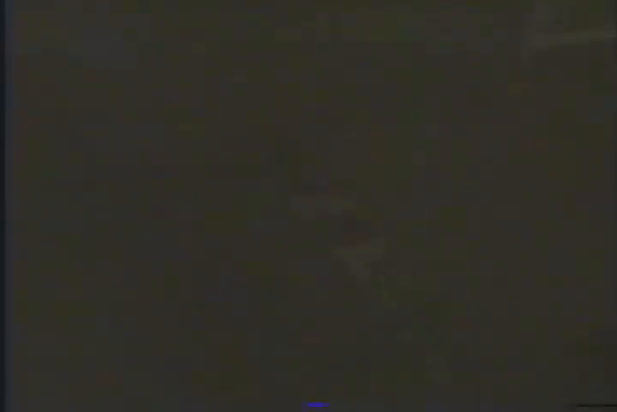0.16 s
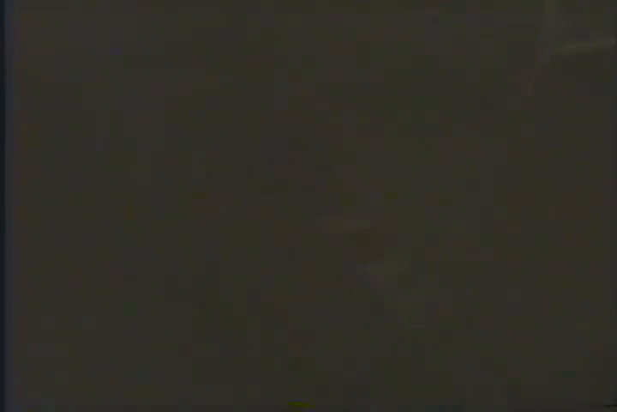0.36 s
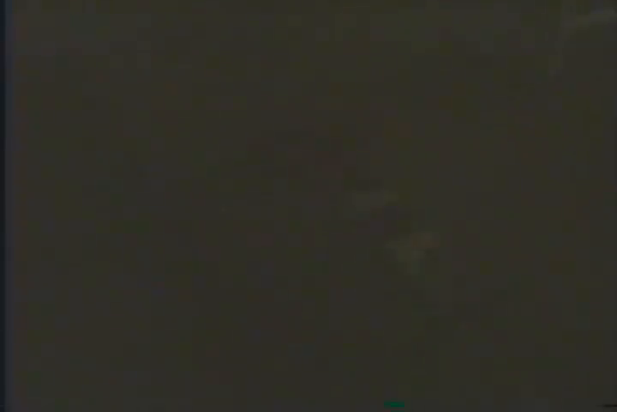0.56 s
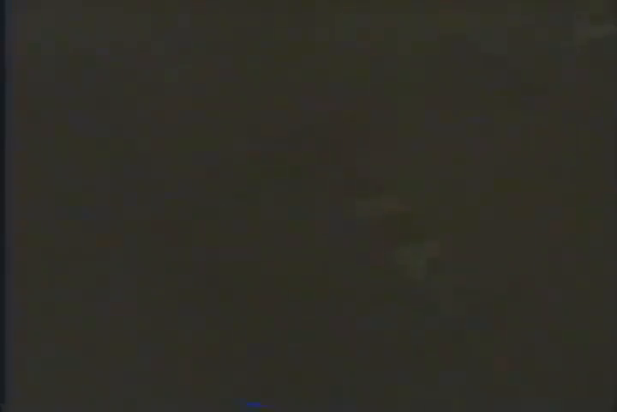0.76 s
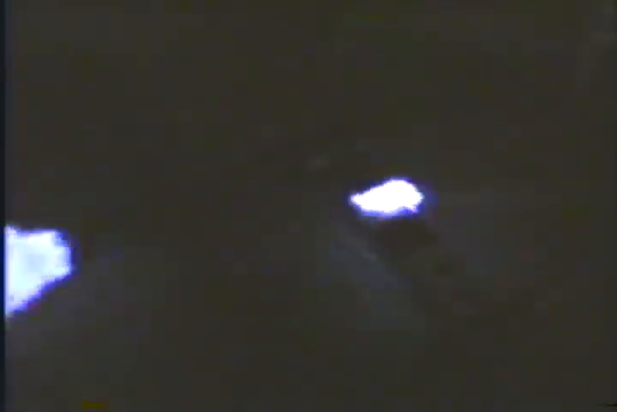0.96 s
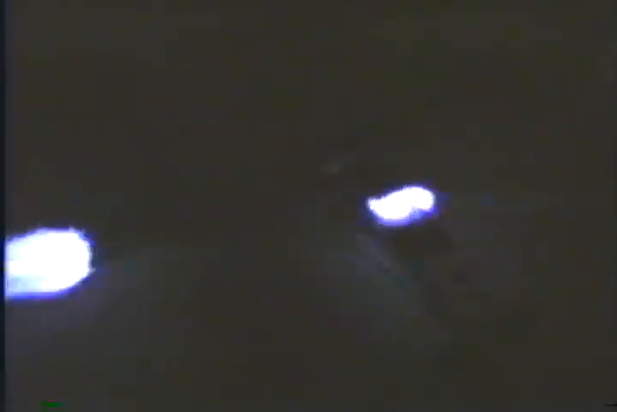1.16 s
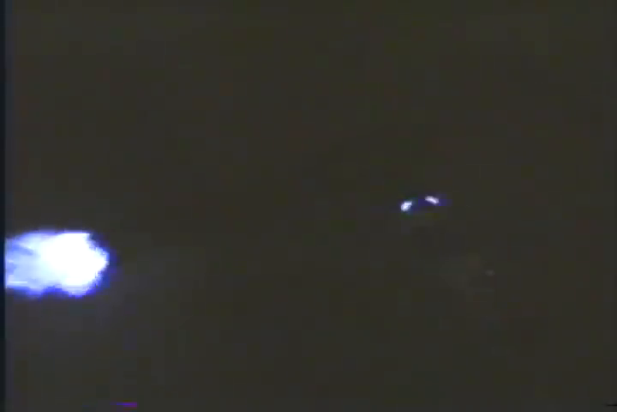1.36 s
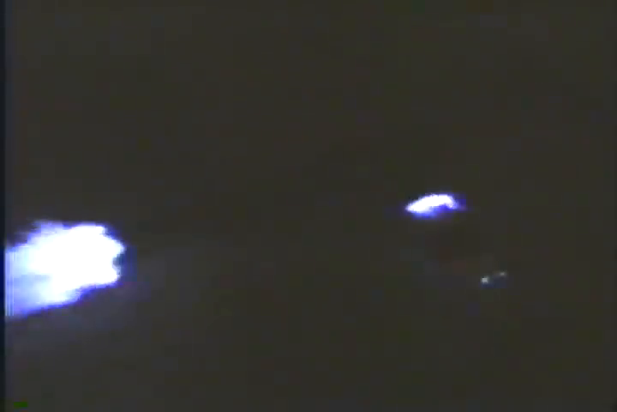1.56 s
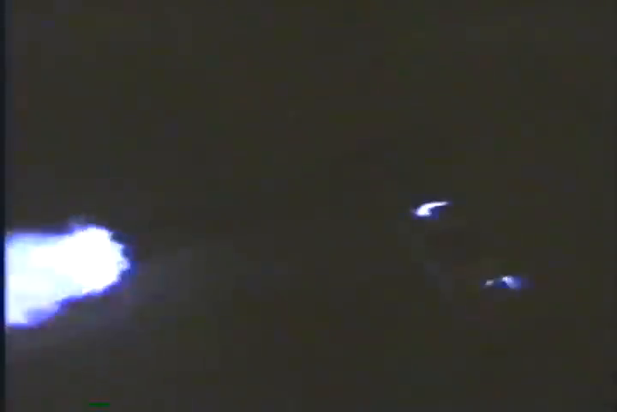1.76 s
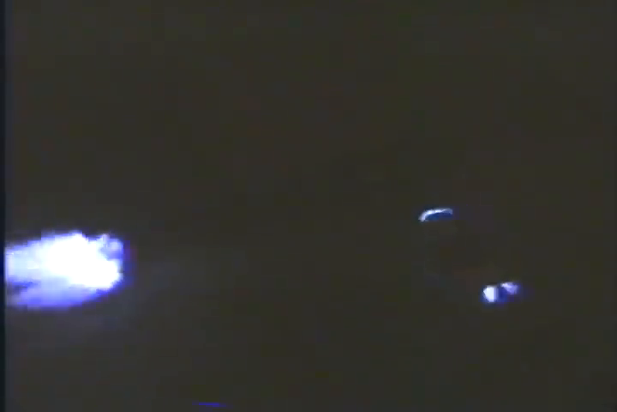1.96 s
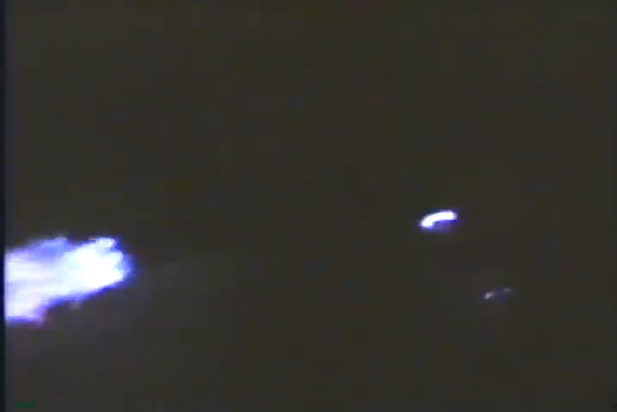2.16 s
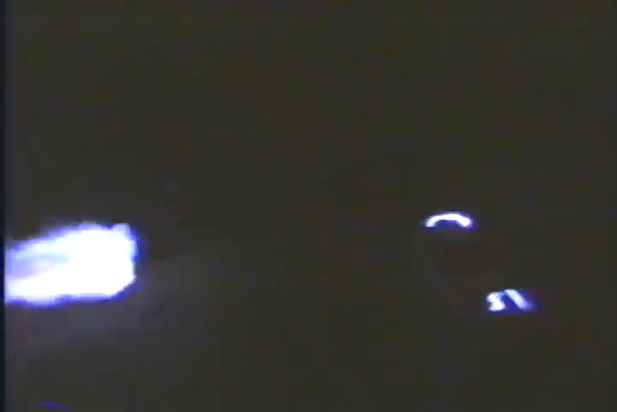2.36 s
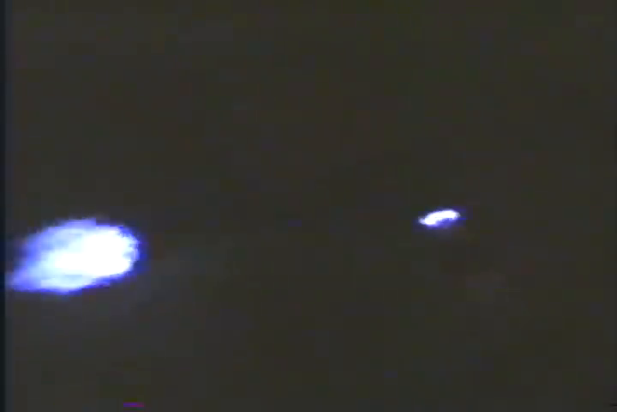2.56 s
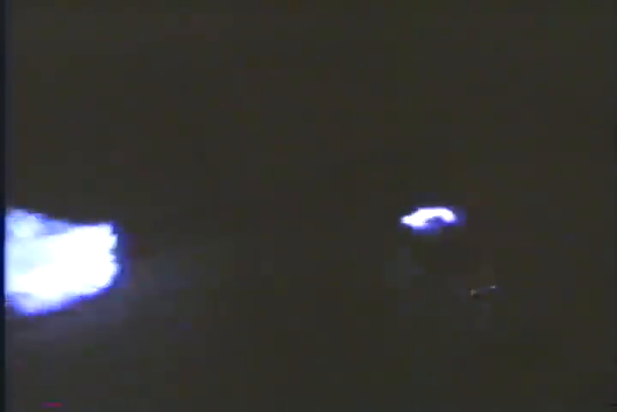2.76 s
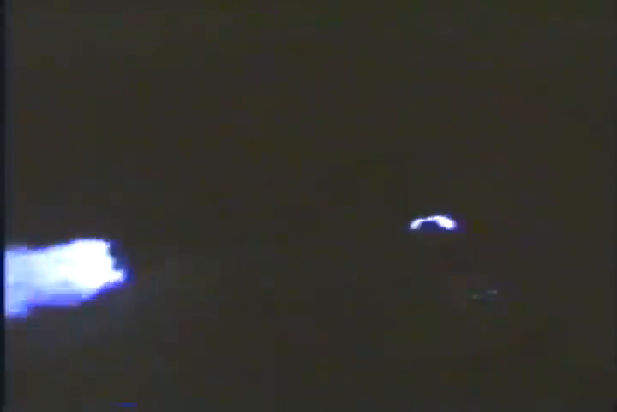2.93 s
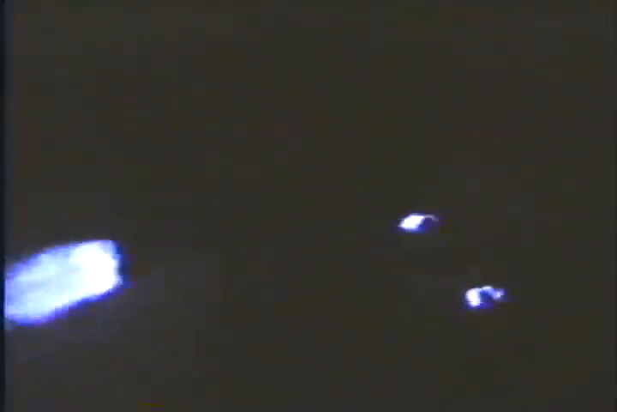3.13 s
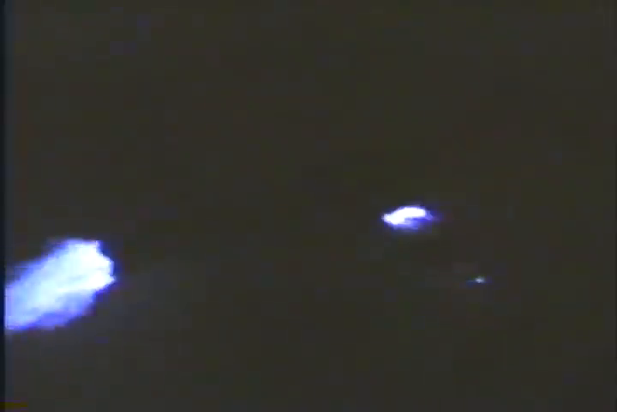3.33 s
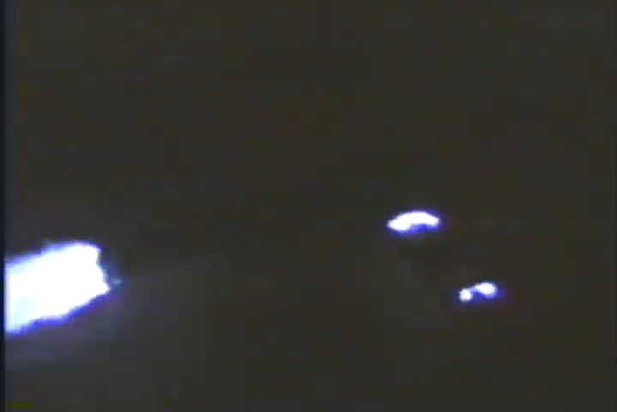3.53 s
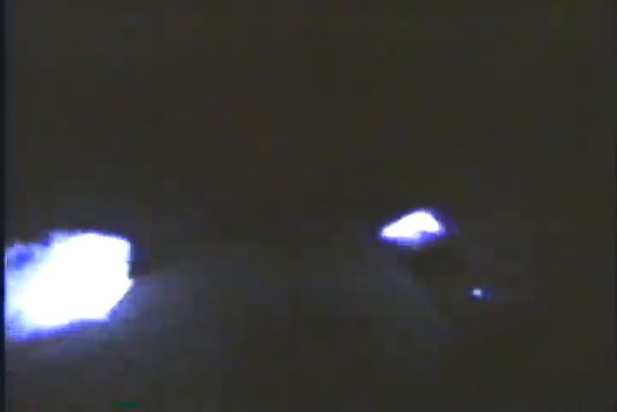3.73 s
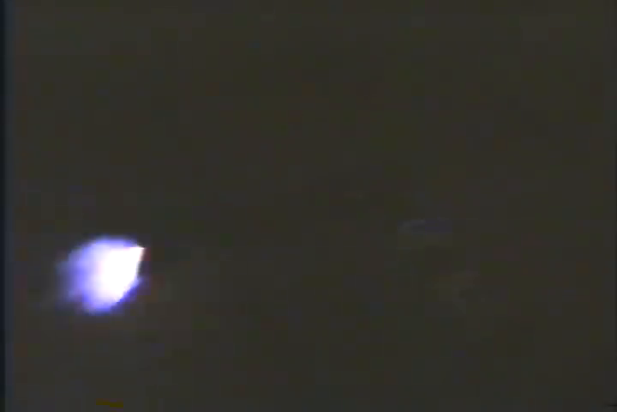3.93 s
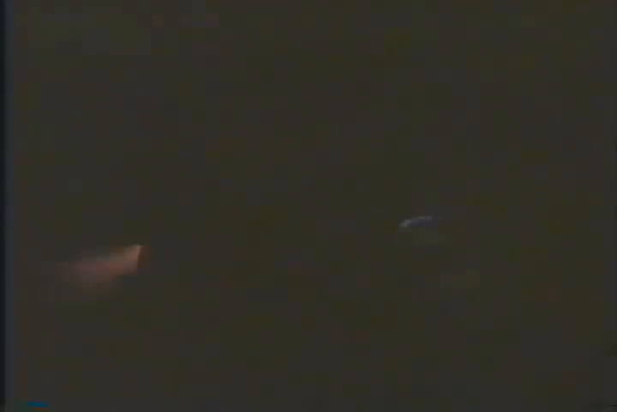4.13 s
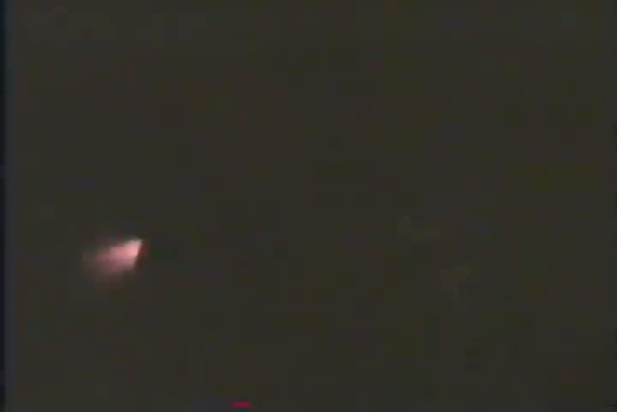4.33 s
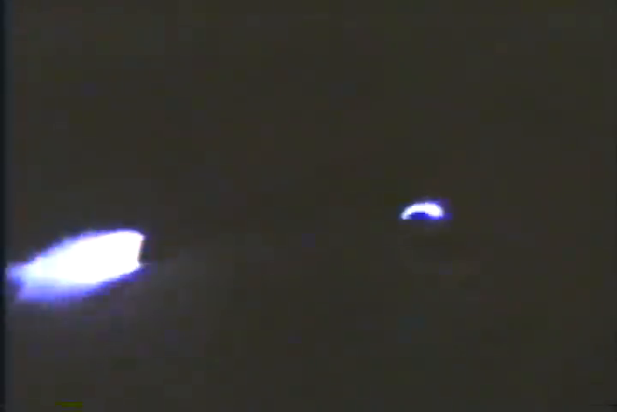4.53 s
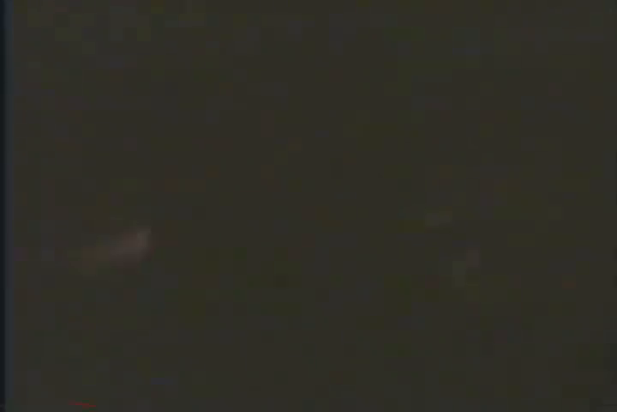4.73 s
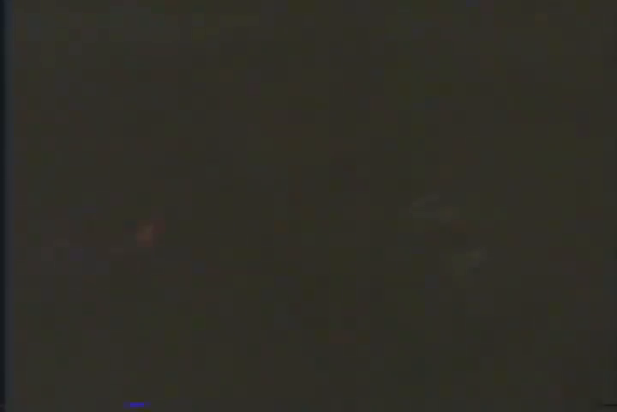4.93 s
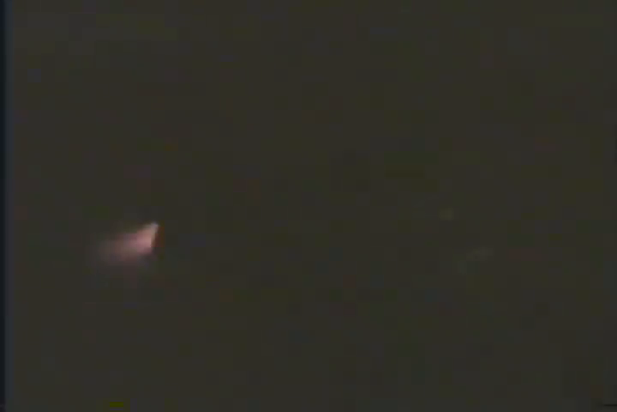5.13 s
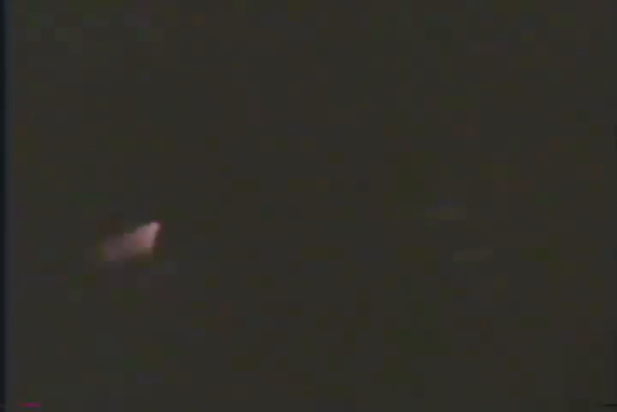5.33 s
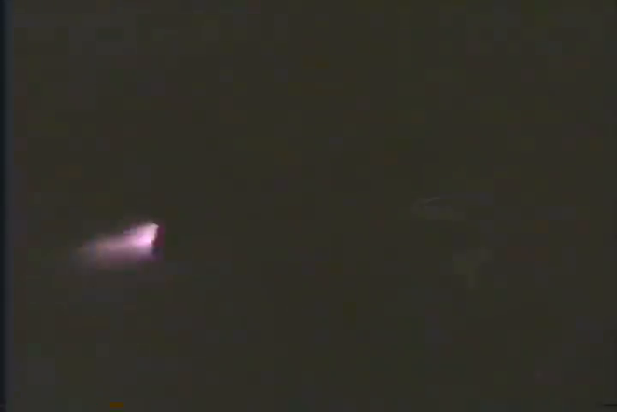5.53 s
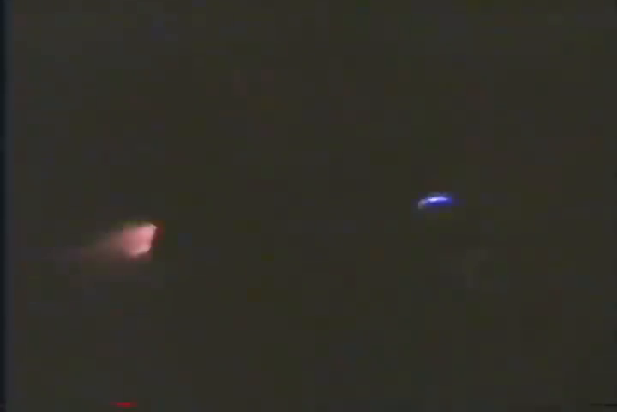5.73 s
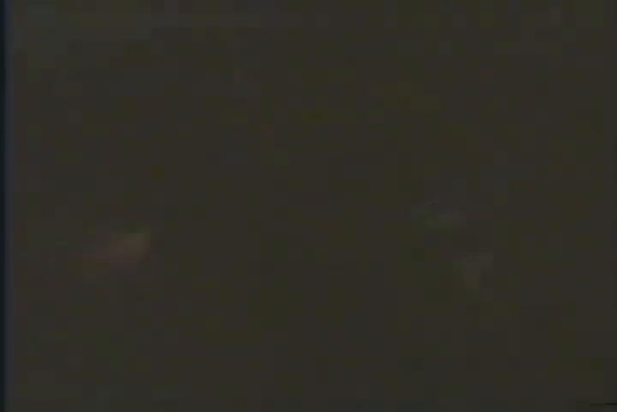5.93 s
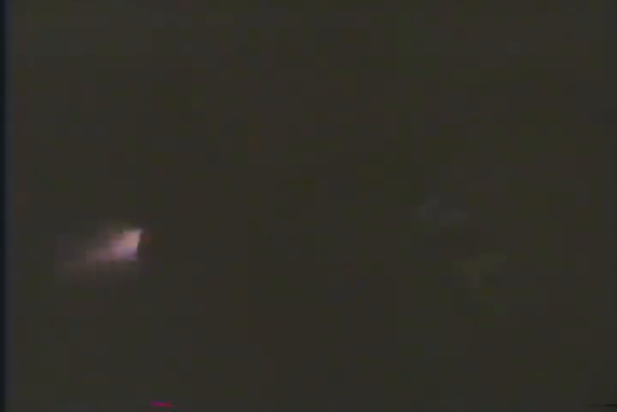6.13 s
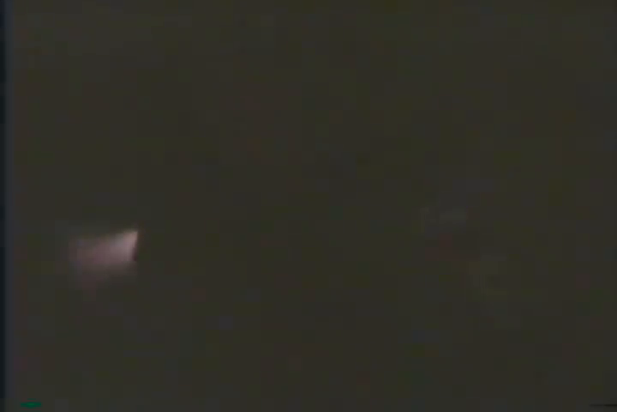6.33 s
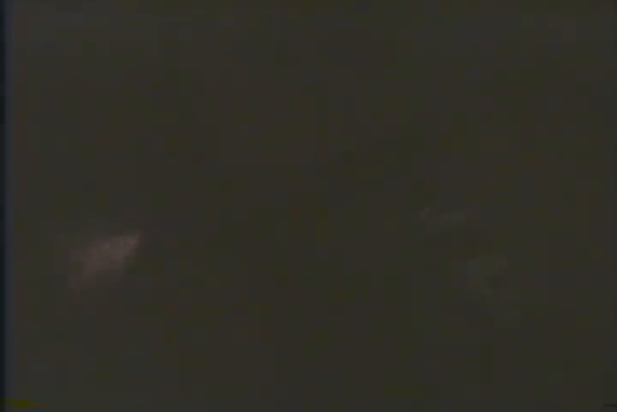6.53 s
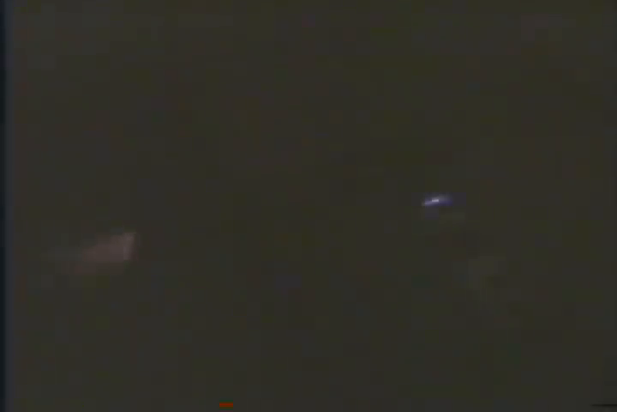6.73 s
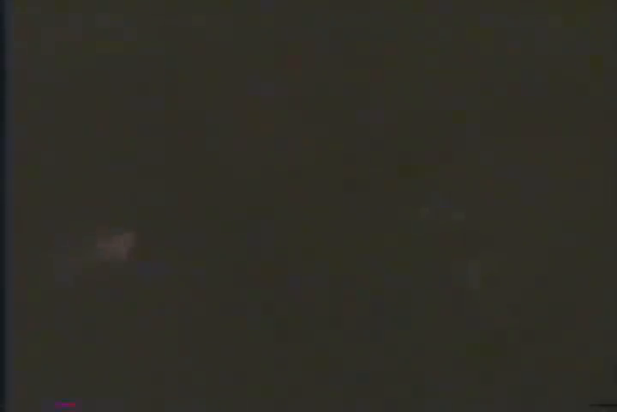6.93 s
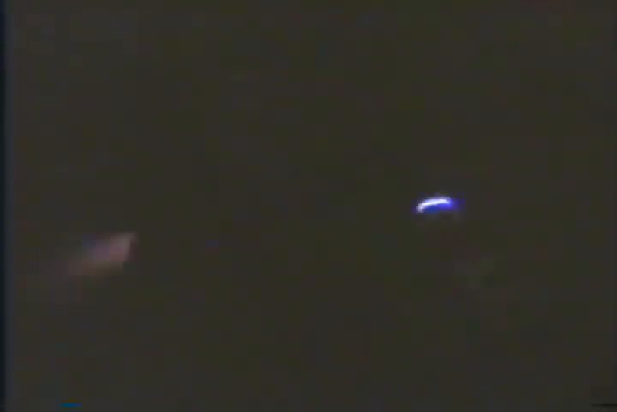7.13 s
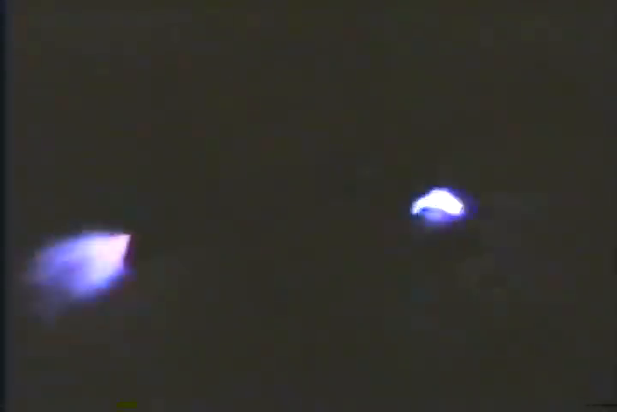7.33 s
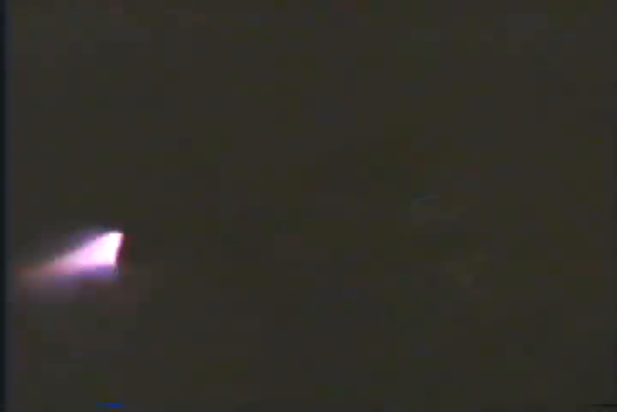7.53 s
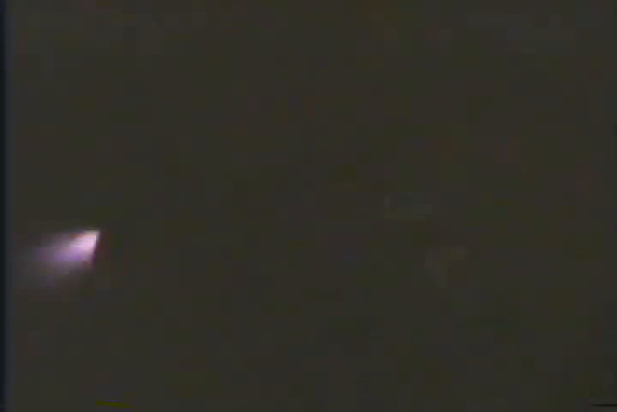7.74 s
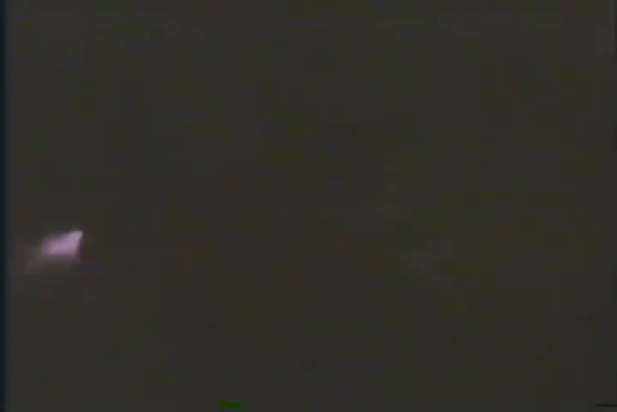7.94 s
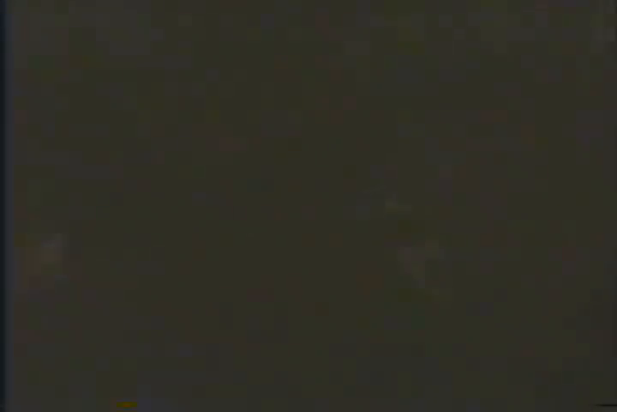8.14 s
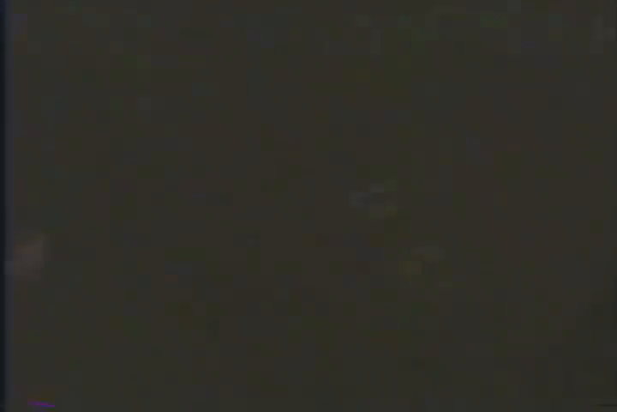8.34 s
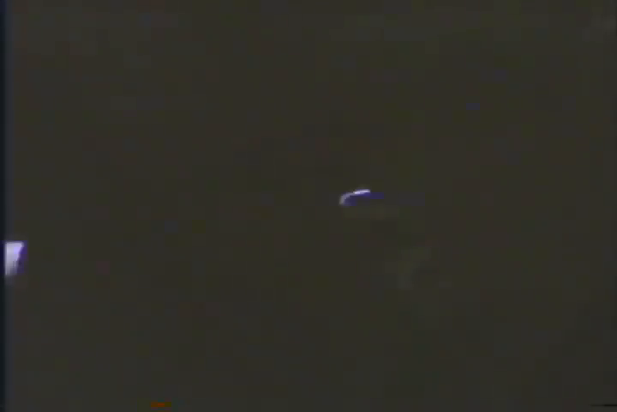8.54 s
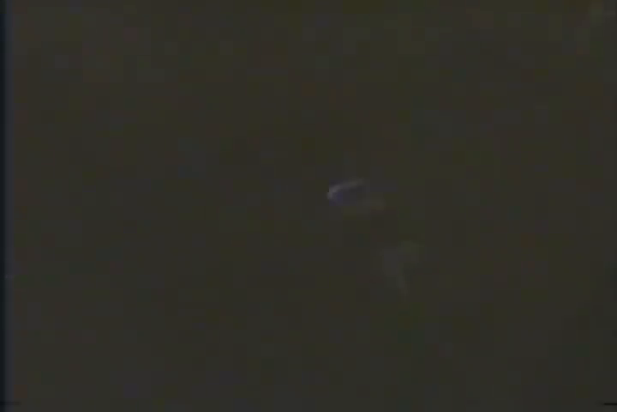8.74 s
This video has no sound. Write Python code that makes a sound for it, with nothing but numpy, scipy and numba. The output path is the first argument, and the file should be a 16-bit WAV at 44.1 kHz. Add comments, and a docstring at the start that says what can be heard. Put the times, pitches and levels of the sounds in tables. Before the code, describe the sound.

Outdoors at night, a few dry clicks precede a swelling, whistly gas jet. It ignites with a deep hollow thump and crackle, the hiss becoming lumpy flame with irregular pops. The pops thicken and the pipe takes off into a sustained, surging roar with a low drone and gusty exhaust hiss. The camera microphone is overdriven and compressed, thin in the deepest bass, practically mono.

```python
"""Small clicks over a faint night hum open the scene, then gas hisses from the nozzle of a pressure jet on a stand.
The gas lights with a bang and sputters as an open flame, heard as lumpy rumble, hiss and pops in the tail pipe.
Then it catches and roars: two noise-driven pipe tones and a broad rumble surge together under gusts of exhaust hiss.
The roar overloads the microphone, which flattens the wave before the bass cut, gain control and tape."""
import sys
import numpy as np
from scipy import signal
from scipy.fft import rfft, irfft
from scipy.io import wavfile
from scipy.ndimage import uniform_filter1d
from numba import njit

SR = 44100
rng = np.random.default_rng(int(sys.argv[2]) if len(sys.argv) > 2 else 0)


def store_wav(level_fs):
    """Save 16-bit WAV to argv[1]."""
    pcm = np.round(np.clip(np.atleast_2d(level_fs), -1, 1) * 32767)
    wavfile.write(sys.argv[1], SR, pcm.T.astype(np.int16))


N = 387638  # length in samples

# Resonant burning: time_s, thrust_db, high_tone_share [0-1 of the tone power]
ROAR = [(3.9, -34, 0.2), (4.0, -19, 0.9), (4.08, -7.5, 0.96), (4.16, -3.5, 0.38), (4.3, -0.5, 0.56),
        (4.7, 4.5, 0.37), (4.83, 6, 0.16), (5.2, 7, 0.13), (5.55, 6, 0.07), (5.63, 3.5, 0.44),
        (5.9, 2.5, 0.59), (6.3, 1, 0.62), (6.55, -1.5, 0.9), (6.9, 2.5, 0.65), (7.15, 0.9, 0.49),
        (7.4, 1.6, 0.67), (8.6, 1.5, 0.66), (8.85, 3.5, 0.8)]
# Surges and falters of the burning: peak_s, extra_thrust_db
SURGES = [(4.111, 7.5), (4.38, 5), (4.519, 5.5), (4.583, 5.5), (4.735, -1), (4.827, 3.5), (4.985, 0),
          (5.217, 2.5), (5.349, 1.5), (5.453, 2.5), (5.864, 2.5), (6.218, 3.5), (6.304, 3.5), (6.46, 3.5),
          (6.513, 3), (6.938, 3), (7.09, -5.5), (7.275, -4), (7.297, 2), (7.381, 5.5), (7.491, -12.5),
          (7.546, 1.5), (7.64, -5), (7.863, 1.5), (8.04, 2.5), (8.35, 1), (8.692, 7)]
# Exhaust hiss spectrum: frequency_hz, density_db [relative, per Hz]
EXHAUST_COLOUR = [(400, -8), (800, -4), (1600, -4), (2600, -10), (4800, -9), (7000, -14), (15000, -22)]
# Open flame: time_s, rumble_db
FLAME = [(0.911, -5), (.98, -15.5), (1.08, -23), (1.1, -14), (1.23, -17), (1.26, -21), (1.4, -24),
         (1.55, -22), (1.63, -24), (1.8, -27), (2.18, -22.5), (2.3, -23.5), (2.5, -24), (2.8, -26.5),
         (3.33, -19.5), (3.6, -24.5), (3.75, -16), (4.1, -21.5)]
# Flame hiss spectrum: frequency_hz, density_db [relative, per Hz]
FLAME_COLOUR = [(350, -4), (520, -27), (600, -8), (675, 1), (810, -7), (955, 0), (1110, -17), (1250, -4),
                (1350, -3), (1750, -3), (2320, -19), (3240, -11), (3750, -21), (4350, -13), (5110, -23),
                (11100, -35)]
# Thin wavering resonances in the flame: pitch_hz, width_hz, level_db [relative]
FLAME_LINES = [(598, 8.1, 6.5), (680, 16, 7.5), (799, 7.6, 8), (947, 20, 4.5)]
# Placed flame pops: time_s, swing_peak_db, pitch_hz, crack_db [relative to the swing]
POPS = [(1.008, -3.5, 224, -11), (1.06, -19, 212, -2), (1.101, -22.5, 168, 3.5), (1.127, -11.5, 238, -23),
        (1.166, -8, 236, -27), (1.183, -9, 210, -18), (1.289, -6.5, 223, -17.5), (1.325, -8.5, 167, -31),
        (1.362, -13, 192, -29), (1.439, -9.5, 250, -13), (1.587, -3.5, 198, -19.5), (1.61, -0.5, 222, -16),
        (1.69, -14, 210, -24), (1.833, -11, 224, -14), (1.92, -14.5, 200, -28), (1.998, -9.5, 168, -9.5),
        (2.191, -9.5, 200, -24), (2.36, -21, 200, -15), (2.403, -5.5, 214, -20), (2.465, -3, 210, -20),
        (2.512, -13, 196, -31), (2.531, -6.5, 213, -13.5), (2.574, -9, 177, -11), (2.644, -10, 180, -14),
        (2.678, -10, 220, -33), (2.832, -8.5, 194, -32), (2.892, -8, 210, -22), (3.077, -12, 200, -25),
        (3.158, -22, 200, -3), (3.227, -8.5, 242, -19), (3.291, -16.5, 205, -0.5), (3.334, -3, 207, -22),
        (3.418, -8.5, 224, -15), (3.584, -9.5, 213, -18), (3.74, 1, 250, -14.5), (3.757, -20, 198, -27),
        (3.839, -10, 193, -8.5), (3.858, -0.5, 182, -16.5), (3.898, -13, 216, -12), (3.936, -3, 216, -15),
        (3.954, -6.5, 200, -11.5), (3.988, -1.5, 202, -23), (4.016, 4, 180, -38)]
# Gas burning on the first swings of the bang: time_s, spread_s, level_db
CRACKLES = [(.9032, .0022, -2), (.941, .004, -19)]
# Whistling intake ducts: pitch_hz, width_hz, level_db [relative]
DUCTS = [(1037, 24, -4.5), (1105, 28, 1.5), (1360, 69, 0), (1693, 41, -8.5), (2430, 30, -8.5),
         (2810, 20, -7.5), (3350, 26, -24), (3800, 110, -20), (4630, 49, -16), (5970, 66, -17),
         (6240, 170, -15), (8240, 140, -15)]
# Gas jet spectrum: frequency_hz, density_db [relative, per Hz]
GAS_COLOUR = [(47, -50), (80, 2), (308, -12), (529, -9.5), (911, -19), (1080, -5.5), (1930, -16),
              (3920, -2.5), (4700, -10), (5500, -29), (7000, -41), (9000, -27), (10300, -13.5),
              (13500, -19), (15400, -50)]
# Small clicks of valve and igniter: start_s, tick_peak_db, knock_db [relative to the tick]
CLICKS = [(0.0294, -45, 25), (0.0482, -47, 27), (0.0967, -18.5, -1.5), (0.199, -41, 12), (0.3652, -47, 21),
          (0.4095, -20.5, -6), (0.4675, -25.5, -1.5), (0.5006, -27, -2), (0.75, -9.5, 1)]
# Night background spectrum: frequency_hz, density_db [relative, per Hz]
NIGHT_COLOUR = [(30, 4), (80, -7.5), (122, 0.5), (200, -10), (500, -11.5), (1000, -13), (1800, -21),
                (2500, -29), (5000, -31.5), (10400, -51)]

# Roar: balance of tones and rumble; the low tone climbs with thrust
TONES_DB, RUMBLE_DB = 0, -7
LOW_HZ, LOW_HZ_PER_DB, HIGH_HZ = 136.46, 2.5, 195
EXHAUST_DB, EXHAUST_PER_DB = -34.5, 1.26  # hiss at 0 dB thrust before the gusts, and its growth
SURGE_RISE_S, SURGE_FALL_S = .007, .02

# Flame: hiss at 0 dB rumble before flicker, and dB of hiss per dB of rumble
FLAME_HISS_DB, HISS_PER_RUMBLE = -32, 0.22
SETTLES_S, HOLLOW = 1.44, .6  # until it settles, this share of the hiss's low part is missing
SPUTTERS_PER_S, SPUTTER_DB, SPUTTER_HZ, SPUTTER_CRACK_DB = 7.6, -18, 204, -29

# Bang: first swing, the ring behind it, and the pipe's pitch climbing as the gas heats
BANG_S, BANG_DB, BANG_FALL_S = .897, 9, .009
RING_DB, RING_HOLD_S, RING_FALL_S = -8, .068, .014
COLD_HZ, HOT_HZ, HEATING_S = 180, 277, 0.062

# Gas: valve cracks open, time to open fully, ignition
VALVE_S, OPENING_S, LIGHT_S = 0.41, 0.28, .905
GAS_DB, GAS_TOP_DB, CREEP_DB_PER_S = -17, -27, 11.5  # gains of body and top at full flow; steady rise
GAS_POWER, TOP_POWER = 2.54, 0.97  # loudness grows as flow to this power: the thin top comes first

NIGHT_DB = -32
WHINE_HZ, WHINE_DB = 15734, -77  # steady thin whine at the very top, rms
BASS_CUT_HZ, BASS_CUT_Q, COUPLING_HZ = 90, .9, 120
TAPE_HZ, TOP_HZ = 9540, 15900  # the treble fades above the first and ends at the second


def roar():
    """Unsteady burning drives two pipe tones and a broad rumble in puffs; the exhaust hisses in gusts."""
    thrust_db, share, gate = curves(ROAR)
    share = np.clip(share, 0, 1)

    low_hz = LOW_HZ + LOW_HZ_PER_DB * np.maximum(thrust_db, -2) + 2.59 * walk(5.2)
    low = unit(band(rng.standard_normal(N), low_hz, 4))
    high_hz = HIGH_HZ * (1 + 0.029 * walk(5.0))
    high = unit(band(band(rng.standard_normal(N), high_hz, 26.7), 198.0, 89.0))
    tones = np.sqrt(1 - share) * low + np.sqrt(share) * high
    rumble = band(band(rng.standard_normal(N), 165, 169), 165, 169)
    rumble = unit(band(rumble, 145.6, 170))
    pipe = undb(TONES_DB) * tones + undb(RUMBLE_DB) * rumble
    pipe = pipe * undb(2.6 * walk(70))

    # strong swings starve the flame and weak ones feed it, so slow surges even out
    pipe = pipe / np.sqrt(uniform_filter1d(pipe ** 2, size=1900))
    peak_s, extra_db = np.transpose(SURGES)
    late = np.arange(N) / SR - peak_s[:, None]
    surge_shapes = np.exp(-(late / np.where(late < 0, SURGE_RISE_S, SURGE_FALL_S)) ** 2)
    pipe = pipe * undb(extra_db @ surge_shapes)

    hiss_db = EXHAUST_DB + EXHAUST_PER_DB * thrust_db
    hiss = noise(EXHAUST_COLOUR) * undb(.7 * walk(80))
    # each puff drives the exhaust harder
    hiss *= (uniform_filter1d(pipe ** 2, size=300) + 0.055) ** 0.12
    return gate * (undb(thrust_db) * pipe + undb(hiss_db) * hiss)


def flame():
    """Lumpy burning rumbles in the pipe, its hiss flickers, and pockets of gas pop."""
    rumble_db, gate = curves(FLAME)
    lumps = rng.standard_normal(N) * undb(3.2 * walk(45))
    rumble = unit(band(band(band(lumps, 152, 157), 228, 104.0), 83, 135))
    rumble += undb(-16.5) * unit(band(band(lumps, 149.0, 43), 149.0, 43))
    hiss_db = FLAME_HISS_DB + HISS_PER_RUMBLE * rumble_db
    out = gate * (undb(rumble_db) * rumble + undb(hiss_db) * flame_hiss())

    for (s, db, hz, crack_db), chance in zip(POPS, rng.standard_normal((len(POPS), 2048))):
        add(out, s - .001, undb(db) * pop(hz, crack_db, chance))

    # small pops at random moments
    start, end = FLAME[0][0], FLAME[-1][0]
    count = int(SPUTTERS_PER_S * (end - start))
    for s, row in zip(rng.uniform(start, end, count), rng.standard_normal((count, 2051))):
        size, pitch, edge = row[:3]
        small_pop = pop(SPUTTER_HZ + 18 * pitch, SPUTTER_CRACK_DB + 1.7 * edge, row[3:])
        add(out, s, undb(SPUTTER_DB + 0.88 * size) * small_pop)
    return out


def flame_hiss():
    """Flickering noise with thin resonances, separate flares and sparse sparks; hollow until it settles."""
    hiss = noise(FLAME_COLOUR) * undb(1.3 * walk(30) + 2.2 * walk(120))
    lines = resonances(FLAME_LINES, 1 + 0.0037 * walk(2.8))
    hiss += undb(-7.0) * lines * undb(1 * walk(4.7))
    for hz in (688, 1027, 1366, 1620, 1923):  # each part of the hiss flares up on its own
        flare = unit(band(band(rng.standard_normal(N), hz, 220), hz, 220))
        hiss += undb(-15 + 5 * walk(20)) * flare
    unsettled = np.clip((SETTLES_S - np.arange(N) / SR) / .05, 0, 1)
    hiss -= HOLLOW * unsettled * band(hiss, 760, 540)
    sparks = (rng.random(N) < 70 / SR) * rng.uniform(-1.4, 1, N)
    hiss += undb(-10) * unit(band(band(sparks, 1500, 1500), 1800, 2500))
    return hiss


def pop(hz, crack_db, chance):
    """A pocket of gas burns: a short crack, then a few swings of the pipe."""
    t = np.arange(len(chance)) / SR
    push = np.exp(-.5 * ((t - .0022) / .0008) ** 2)
    swing = band(band(push, hz, 125), hz, 170)
    crack = chance * np.exp(-t / .002) * np.minimum(t / .0003, 1)
    crack = band(band(crack, 1500, 2400), 1800, 4500)
    return swing / np.abs(swing).max() + undb(crack_db) * crack / np.abs(crack).max()


def bang():
    """A deep thump; the pipe swings freely after it and burning gas crackles on the first swings."""
    t = np.arange(N) / SR
    after = np.maximum(t - BANG_S, 0)
    pitch_hz = COLD_HZ + (HOT_HZ - COLD_HZ) * np.minimum(after / HEATING_S, 1)
    swing = -np.sin(2 * np.pi * np.cumsum((after > 0) * pitch_hz) / SR)
    first = undb(BANG_DB) * np.exp(-after / BANG_FALL_S)
    ring = undb(RING_DB + 1.0 * walk(87.5)) * np.exp(-np.maximum(after - RING_HOLD_S, 0) / RING_FALL_S)
    size = np.minimum(after / .003, 1) * (first + ring)
    thump = undb(2.0) * np.sin(2 * np.pi * 70 * after) * np.exp(-after / 0.032)
    burst = sum(undb(db) * np.exp(-.5 * ((t - s) / spread) ** 2) for s, spread, db in CRACKLES)
    crackle = unit(band(band(rng.standard_normal(N), 1200, 1500), 1200, 2000))
    return size * swing + thump + burst * crackle


def gas():
    """Turbulent jet noise; the intake ducts whistle in it, a little higher as the flow grows."""
    t = np.arange(N) / SR
    flow = np.clip((t - VALVE_S) / OPENING_S, 0, 1)
    unlit = np.clip((LIGHT_S - t) / 0.0018, 0, 1)
    creep = undb(CREEP_DB_PER_S * (t - VALVE_S - OPENING_S))
    glide = 0.92 + 0.084 * flow + 0.0062 * walk(18.4)
    whistles = resonances(DUCTS, glide[:SR])
    body = undb(-5.5) * noise(GAS_COLOUR) + undb(-6.0) * whistles
    top = noise([(6000, -4.0), (7000, -6.5), (8200, -7.5), (8800, -24), (15000, -50)])
    jet = undb(GAS_DB) * flow ** GAS_POWER * body + undb(GAS_TOP_DB) * flow ** TOP_POWER * top
    return unlit * creep * jet


def clicks():
    """Valve and igniter: each click is a brief bright tick and a duller, longer knock."""
    out, t = np.zeros(N), np.arange(1024) / SR
    for (s, db, knock_db), chance in zip(CLICKS, rng.standard_normal((len(CLICKS), 1024))):
        tick = chance * np.exp(-t / 0.00057)
        for _ in range(3):
            tick = band(tick, 3000, 3000)
        knock = band(band(chance * np.exp(-t / 0.01), 680, 510), 990, 1100)
        click = tick / np.abs(tick).max() + undb(knock_db) * knock / np.abs(knock).max()
        add(out, s, undb(db) * click)
    return out


def night():
    """Distant hum and rustle as wavering shaped noise, with a faint high whine from a narrow band."""
    whine = undb(-21.5) * unit(band(rng.standard_normal(N), 2700, 50))
    return undb(NIGHT_DB + 1.2 * walk(40)) * (noise(NIGHT_COLOUR) + whine)


def resonances(table, glide):
    """Noise in narrow resonances whose pitches move together, for as long as the glide lasts."""
    white = rng.standard_normal(len(glide))
    rings = unit(sum(undb(db) / np.sqrt(w) * band(white, hz * glide, w) for hz, w, db in table))
    return np.pad(rings, (0, N - len(glide)))


def undb(db):
    """Turn decibels into an amplitude factor."""
    return 10 ** (np.asarray(db) / 20)


def unit(x):
    """Scale to rms 1."""
    return x / np.sqrt(np.mean(x ** 2))


def curves(table):
    """Columns of a table at every sample, and a gate that is open while the table lasts."""
    s, *columns = np.transpose(table)
    t = np.arange(N) / SR
    gate = np.interp(t, [s[0] - .004, s[0], s[-1], s[-1] + .004], [0, 1, 1, 0])
    return [np.interp(t, s, c) for c in columns] + [gate]


@njit
def svf(x, hz, width):
    """State-variable band-pass with a moving centre, gain 1 there."""
    y, b, l = np.empty(len(x)), 0., 0.
    for i in range(len(x)):
        g, k = np.tan(np.pi * hz[i] / SR), width / hz[i]
        v = (b + g * (x[i] - l)) / (1 + g * (g + k))
        b = 2 * v - b
        l = l + 2 * g * v
        y[i] = k * v
    return y


def band(x, hz, width):
    """Band-pass around a fixed or moving pitch, width in Hz."""
    return svf(x + 1e-18, hz * np.ones(len(x)), 1. * width)


def noise(colour):
    """Noise of rms 1 with a spectrum of (Hz, dB) points."""
    hz, db = np.transpose(colour)
    f = np.arange(N // 2 + 1) * SR / N + 1
    shape = undb(np.interp(np.log(f), np.log(hz), db))
    return unit(irfft(rfft(rng.standard_normal(N)) * shape, N))


def walk(rate):
    """Random levels held 1 / rate s and slewed twice, rms 1."""
    k = int(SR / rate)
    steps = np.repeat(rng.standard_normal(N // k + 1), k)
    return unit(uniform_filter1d(uniform_filter1d(steps, k), k)[:N])


def add(out, s, x):
    """Mix a short sound in at s seconds."""
    i = int(s * SR)
    out[i:i + len(x)] += x[:N - i]


@njit
def follow(x, attack, release):
    """Envelope follower with separate smoothing for rise and fall."""
    e, y = 0., np.empty(len(x))
    for i in range(len(x)):
        e += (abs(x[i]) - e) * (attack if abs(x[i]) > e else release)
        y[i] = e
    return y


def scene():
    """Mix the engine and clicks over the night, the same in both channels."""
    engine = roar() + flame() + bang() + gas()
    # the louder the engine has been, the further the gain control holds the background down
    engine_level = follow(engine, 1 / (0.017 * SR), 1 / (3 * SR))
    duck = np.minimum(1, 0.016 / (engine_level + 1e-9))
    mono = engine + clicks() + duck * night()
    return np.array([mono, mono])


def record(dry):
    """The microphone bends upward swings softly and stops downward ones hard; bass cut, gain control, tape."""
    x = dry[0]
    x = np.where(x > 0, np.tanh(x), x / (1 + (np.abs(x) / .76) ** 6) ** (1 / 6))

    w = 2 * np.pi * BASS_CUT_HZ
    x = signal.lfilter(*signal.bilinear([1, 0, 0], [1, w / BASS_CUT_Q, w * w], SR), x)
    x = signal.lfilter(*signal.butter(1, COUPLING_HZ, "high", fs=SR), x)

    loud = follow(x, 1 / (0.0072 * SR), 1 / (.4 * SR))
    x = np.clip(x * np.minimum(1, 0.44 / (loud + 1e-9)), -.92, .92)
    x = signal.sosfilt(signal.butter(6, TAPE_HZ, fs=SR, output="sos"), x)

    # tape: a deep murmur that grows with the sound, and a steady hiss, practically the same in both channels
    murmur_colour = [(15, -3), (30, -13.5), (45, 0.0), (80, 11.0), (110, -24.5), (200, -54.0)]
    murmur = undb(-24.0) * np.minimum(loud, .3) ** 1.51 * noise(murmur_colour)
    hiss_colour = [(100, 4.5), (8000, -1.0), (11500, -4.0), (14000, -16.5), (15000, -35.0)]
    hiss, side_hiss = noise(hiss_colour), noise(hiss_colour)

    # the left input takes the bass a shade stronger
    bass = signal.lfilter(*signal.butter(2, 300, fs=SR), x)
    side = undb(-37.0) * bass + undb(-91) * side_hiss
    whine = undb(WHINE_DB) * np.sqrt(2) * np.sin(2 * np.pi * WHINE_HZ * np.arange(N) / SR)
    x = x + murmur + undb(-55.5) * hiss + whine
    top_cut = signal.ellip(8, .2, 70, TOP_HZ, fs=SR, output="sos")
    return signal.sosfilt(top_cut, [x + side, x - side])


dry = scene()
out = record(dry)
store_wav(out)
```